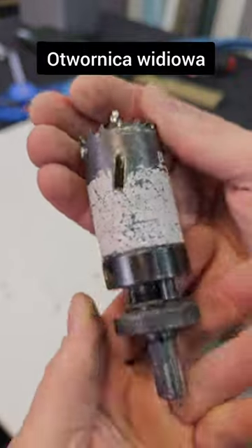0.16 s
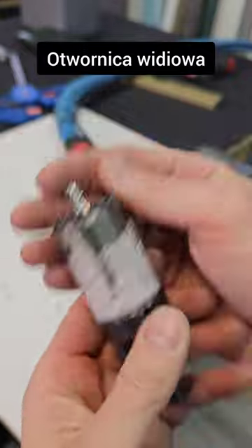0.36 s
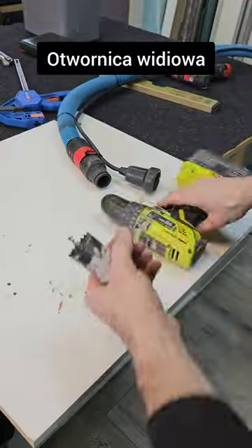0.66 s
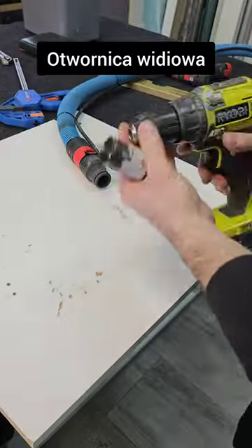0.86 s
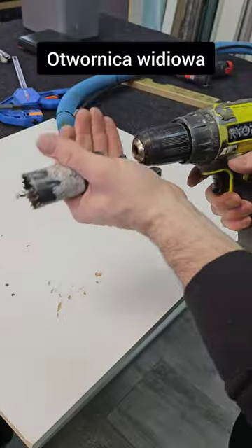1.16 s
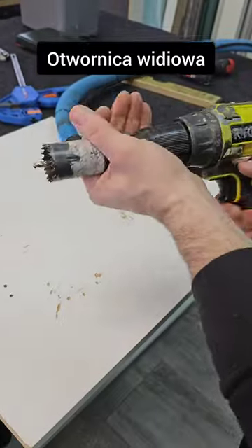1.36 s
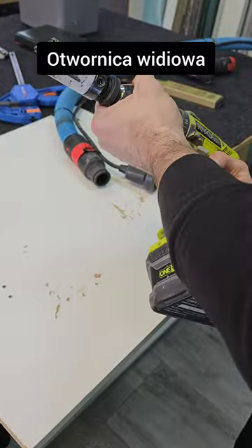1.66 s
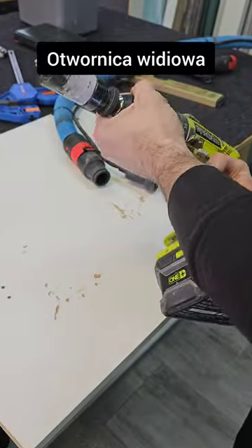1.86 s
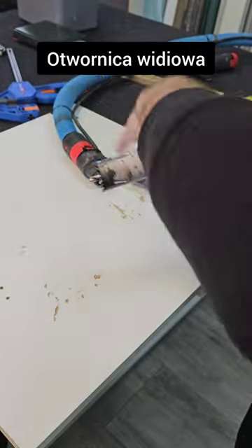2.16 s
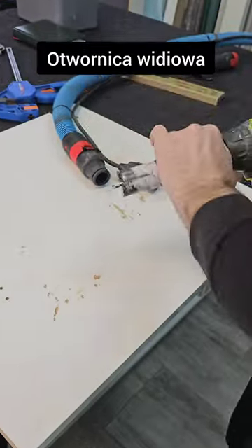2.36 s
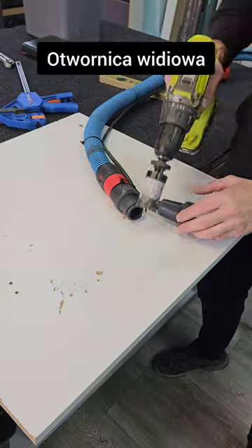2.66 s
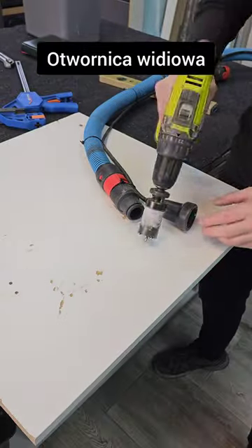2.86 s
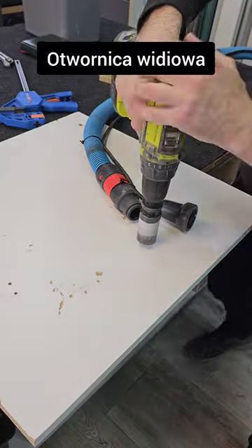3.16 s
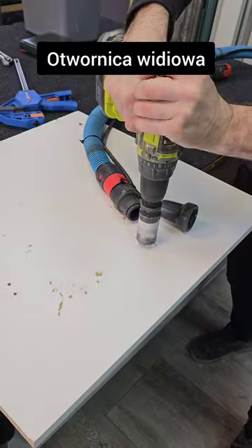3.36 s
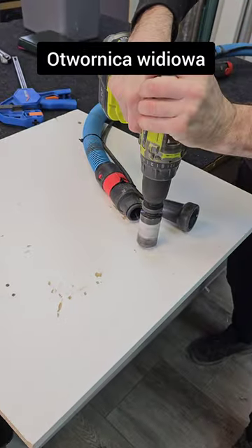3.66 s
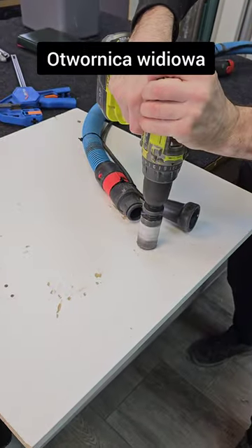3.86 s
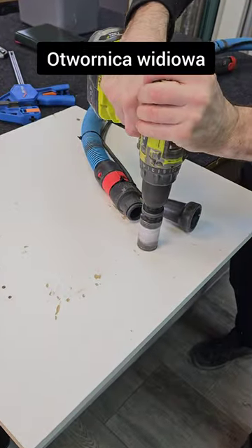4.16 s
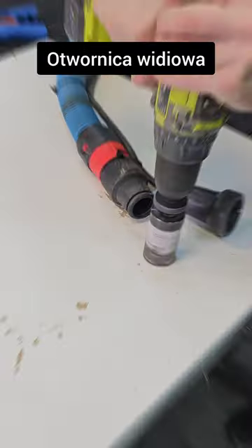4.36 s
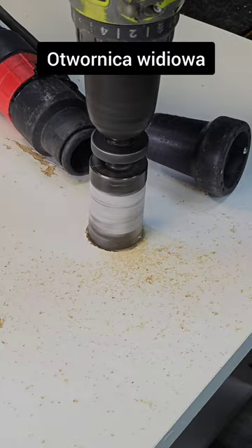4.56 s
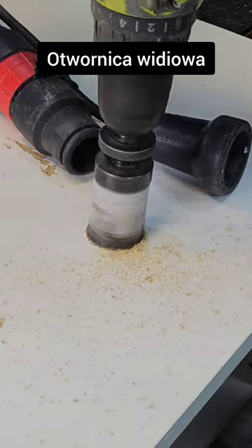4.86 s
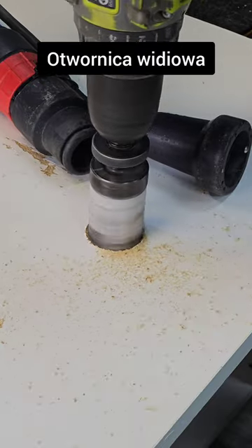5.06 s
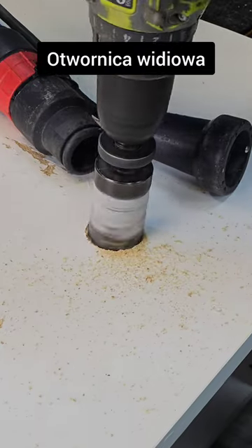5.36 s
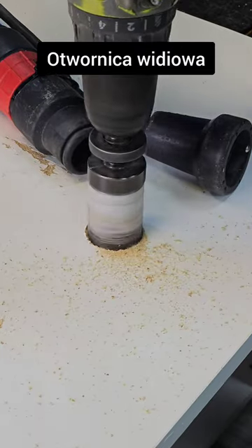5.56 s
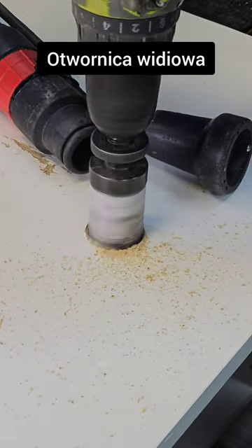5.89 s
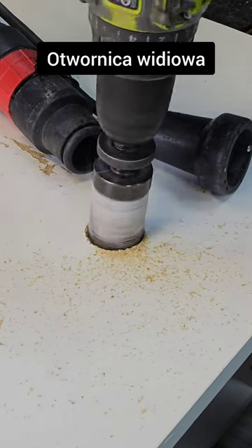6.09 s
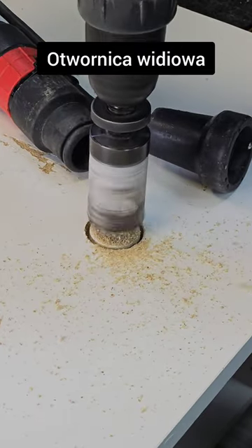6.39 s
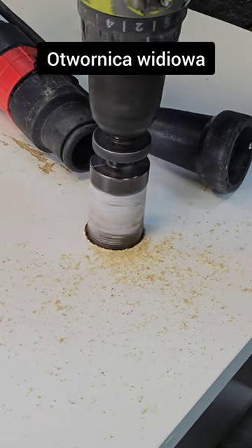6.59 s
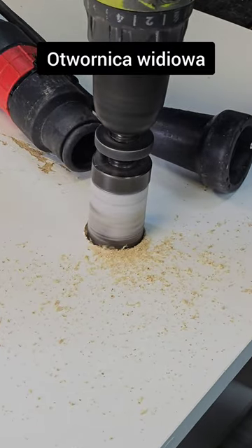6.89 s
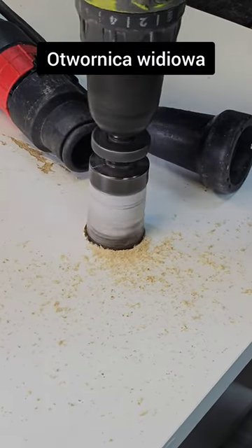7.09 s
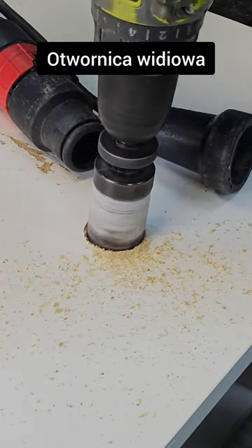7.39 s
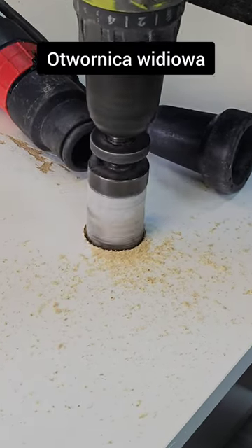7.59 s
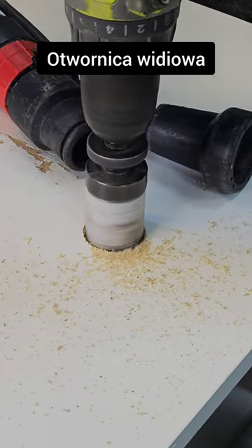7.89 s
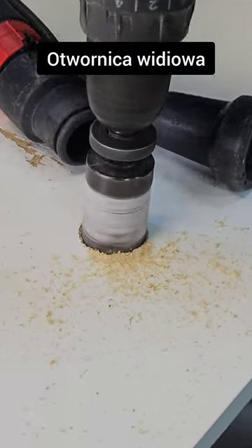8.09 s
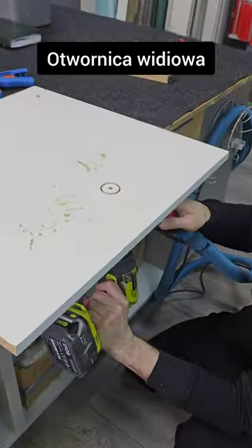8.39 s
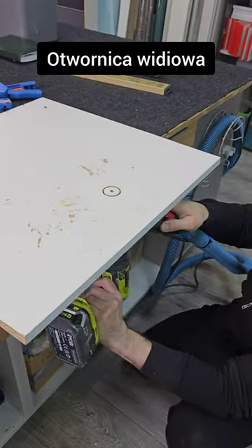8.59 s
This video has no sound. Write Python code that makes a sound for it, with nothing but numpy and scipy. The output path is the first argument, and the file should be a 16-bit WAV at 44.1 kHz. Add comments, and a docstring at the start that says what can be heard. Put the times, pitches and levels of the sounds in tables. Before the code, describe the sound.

Metallic clicks and handling scrapes, then a steady drill motor hum with thin whine, harsh grinding and wavering squeals as a hole saw cuts wood.

```python
"""In a workshop with a low hum a cordless drill bumps a board, and a hole saw clinks and rasps into its chuck.
Clinks, knocks and rings are struck modes and bursts of noise; sliding hands and sleeve are coloured grains.
The drill then runs at a governed speed: a sine hum, rattling grains and a thin narrow-band whine.
The saw grinds into the board with squeals (grains and gliding resonances), eases off once, bites again and
at last cuts from underneath. Twice the sound of drill and saw fades to near silence and back."""
import sys
import numpy as np
from scipy import signal
from scipy.fft import rfft, irfft, next_fast_len
from scipy.io import wavfile
from scipy.ndimage import map_coordinates

SR = 44100
rng = np.random.default_rng(int(sys.argv[2]) if len(sys.argv) > 2 else 0)


def materialize(psi):
    """Save the field psi as 16-bit PCM at rate SR to the path in sys.argv[1].

    A 1-D psi becomes a single channel; in a 2-D psi each row is a channel.
    """
    bounded = np.clip(np.atleast_2d(psi).T, -1, 1)
    quanta = np.round(bounded * 32767).astype(np.int16)
    wavfile.write(sys.argv[1], SR, quanta)


N = 385434
T = np.arange(N) / SR

# trigger pulled; saw sunk in its groove; cut goes on from underneath
TRIGGER_S, GROOVE_S, UNDERNEATH_S = 2.6, 4.42, 8.28
# Short jabs on the trigger spin the sleeve through the hand. Each row: start in seconds, length in seconds,
# first pitch in Hz, top pitch in Hz, relative whirr level in dB, relative rasp level in dB.
JABS = [(2.343, 0.065, 450, 1100, -38, -28), (2.457, 0.055, 492, 767, -28, -27.5)]


def from_db(db):
    """Decibels to amplitude factor."""
    return 10 ** (np.asarray(db) / 20)


def rms_one(x):
    """Scale to rms 1 over all channels."""
    return x / np.sqrt(np.mean(x ** 2) + 1e-20)


def in_time(rows):
    """Interpolate each column of a (seconds, values..) curve at every sample."""
    seconds, *columns = np.transpose(rows)
    return [np.interp(T, seconds, column) for column in columns]


def gain_at(points, hz):
    """Read a (Hz, dB) spectrum on a log-frequency axis as amplitude."""
    point_hz, db = np.transpose(points)
    return from_db(np.interp(np.log(hz + 1), np.log(point_hz), db))


def white_pair():
    """Two unrelated white noises."""
    return rng.standard_normal((2, N))


def drift(rate):
    """Slow random curve of rms 1, with 2 * rate knots per second."""
    knots = rng.standard_normal(int(N / SR * rate * 2) + 2)
    return rms_one(np.interp(T * rate * 2, np.arange(len(knots)), knots))


def grains(per_s, spread_db):
    """Two trains of random clicks of uneven size; rms 1."""
    sizes = from_db(spread_db * np.minimum(rng.exponential(1, (2, N)), 4))
    present = rng.random((2, N)) < per_s / SR
    return rms_one(rng.standard_normal((2, N)) * sizes * present)


def colour(pair, tone, peaks=()):
    """Filter two unrelated signals by a broad tone and resonances, then matrix to stereo; mid rms 1."""
    # Stereo width. Each row: frequency in Hz, side minus mid in dB.
    width = [(60, -20), (250, -14), (500, -11), (1000, -4), (2000, -3.5), (8000, 1), (13000, 2)]
    size = next_fast_len(N)
    hz = np.arange(size // 2 + 1) * SR / size
    power_lift = 1
    for peak_hz, width_hz, db in peaks:
        power_lift = power_lift + (from_db(db) ** 2 - 1) / (1 + (2 * (hz - peak_hz) / width_hz) ** 2) ** 2
    gain = gain_at(tone, hz) * np.sqrt(np.abs(power_lift))
    spectra = rfft(pair, size) * gain * [np.ones_like(hz), gain_at(width, hz)]
    mid, side = irfft(spectra, size)[:, :N]
    return np.array([mid + side, mid - side]) / np.sqrt(np.mean(mid ** 2))


def narrow(hz, width_hz):
    """Friction-driven resonance: low-passed complex noise shifted to a centre that may move; stereo, rms 1."""
    white = rng.standard_normal((2, N)) + 1j * rng.standard_normal((2, N))
    a, b = signal.sosfilt(signal.butter(2, width_hz / 2, fs=SR, output="sos"), white)
    carrier = np.exp(2j * np.pi * np.cumsum(hz + 0 * T) / SR)
    return rms_one(np.real(np.array([a + 0.48 * b, a - 0.21 * b]) * carrier))


def strike(times_s, levels_db, modes):
    """Each blow rings every decaying mode, with a random strength per mode."""
    out = np.zeros(N)
    for hz, db, t60_s in modes:
        clicks = np.zeros(N)
        blow_db = np.array(levels_db) + db + rng.normal(0, 1, len(times_s))
        clicks[(np.array(times_s) * SR).astype(int)] = from_db(blow_db)
        radius = from_db(-60 / (t60_s * SR))
        angle = 2 * np.pi * hz / SR
        poles = [1, -2 * radius * np.cos(angle), radius * radius]
        out += rng.choice([-1, 1]) * signal.lfilter([0, np.sin(angle)], poles, clicks + 1e-18)
    return out


def bursts(times_s, levels_db, decay_s):
    """Envelope that jumps at each contact and dies away exponentially."""
    jumps = np.zeros(N)
    jumps[(np.array(times_s) * SR).astype(int)] = from_db(levels_db)
    return signal.lfilter([1], [1, -np.exp(-1 / (decay_s * SR))], jumps + 1e-18)


def strokes(rows, attack_s, release_s):
    """Envelope of (start s, length s, dB) movements: linear rise, hold, exponential fall; loudest wins."""
    out = np.zeros(N)
    for start_s, length_s, db in rows:
        rise = np.clip((T - start_s) / attack_s, 0, 1)
        fall = np.exp(-np.clip((T - start_s - length_s) / release_s, 0, 20))
        out = np.maximum(out, from_db(db) * rise * fall)
    return out


def by_stage(free, groove, below):
    """Select by stage: drill in the open, saw in its groove, cut from underneath."""
    return np.where(T < GROOVE_S, free, np.where(T < UNDERNEATH_S, groove, below))


def room_air():
    """Faint broadband room noise, weighted to the bass."""
    # Each row: frequency in Hz, relative level in dB.
    room_tone = [(15, -34), (25, -1), (75, 1), (167, -20), (3830, -38), (10000, -42), (15000, -45)]
    return from_db(-65.0) * colour(white_pair(), room_tone)


def room_hum():
    """A low sine with wandering phase and level, louder in swells."""
    # Each row: start in seconds, length in seconds, relative level in dB added to the steady hum.
    hum_swells = [(-.1, .11, -54), (.7, .82, -56)]
    gain = from_db(-70) + strokes(hum_swells, attack_s=.08, release_s=.05)
    tone = np.sin(2 * np.pi * 68 * T + .5 * drift(4.6))
    return gain * tone * from_db(2 * drift(2.8))


def workshop(x, wet_db, t60_s):
    """Add a short diffuse tail of decaying noise, different at each ear."""
    t = T[:SR // 2]
    tail = rng.standard_normal((2, len(t))) * np.exp(-np.log(1000) * t / t60_s) * (t > .004)
    tail = signal.lfilter([1], [1, -.4], tail)
    tail = tail / np.sqrt(np.sum(tail[0] ** 2))
    return x + from_db(wet_db) * signal.fftconvolve(x, tail, axes=1)[:, :N]


def fumbling():
    """The drill shifts in the hand: a soft swell of low noise."""
    # Each row: start in seconds, length in seconds, level in dB.
    shifts = [(.57, 0.32, -54)]
    tone = [(60, -1), (250, 1), (550, -6), (1200, -34), (8000, -60)]
    return strokes(shifts, attack_s=0.04, release_s=0.11) * colour(white_pair(), tone)


def board_knocks():
    """The drill knocks on the board: returns the ringing modes and the crack of contact noise."""
    # Each row: time in seconds, relative level in dB.
    blows = [(.706, -16), (.712, -25), (0.733, -28)]
    # Board modes. Each row: frequency in Hz, relative level in dB, t60 in seconds.
    board_modes = [(159.4, -3, 0.14), (269, -6, 0.1), (400, 2.5, 0.05), (511, -7, 0.17), (684, -9, 0.043),
                   (940, -25, .05)]
    times_s, knock_db = np.transpose(blows)
    crack_tone = [(60, 9.5), (700, -5), (2000, -13.5), (12000, -37)]
    crack = bursts(times_s, knock_db - 5.5, decay_s=0.0085) * colour(white_pair(), crack_tone)
    return strike(times_s, knock_db, board_modes), crack


def clinks():
    """Steel touches the chuck: noise ticks and the ringing modes of the saw cup."""
    # Each row: time in seconds, relative tick level in dB, relative ring level in dB.
    touches = [(0.837, -36, -70), (0.863, -28, -70), (1.231, -21.5, -60), (1.244, -20, -39),
               (1.294, -22, -43), (1.314, -10, -25), (1.37, -23, -35), (1.459, -33, -43), (1.545, -35, -54),
               (1.588, -19, -47), (1.611, -25, -25), (1.649, -21, -25.5), (1.669, -22, -31),
               (1.685, -18.5, -26), (1.712, -31, -30), (2.13, -33, -57)]
    # Saw cup modes. Each row: frequency in Hz, relative level in dB, t60 in seconds.
    cup_modes = [(1830, -14, .1), (3000, -17, 0.23), (4420, 0, 0.15), (4500, -3.5, 0.1), (6770, 1, 0.017),
                 (8720, -12, 0.075), (15550, -16, .1)]
    # Each row: frequency in Hz, relative level in dB.
    tick_tone = [(100, -34), (500, 12), (1800, 7.5), (3000, 3), (7000, -4), (10000, -13), (16000, -4)]
    times_s, tick_db, ring_db = np.transpose(touches)
    ticks = bursts(times_s, tick_db - 8.5, decay_s=0.0036) * colour(white_pair(), tick_tone)
    return ticks + strike(times_s, ring_db, cup_modes)


def brushed_cup():
    """Fingers brush the teeth and the cup sings faintly on two friction-driven modes."""
    # Each row: start in seconds, length in seconds, relative level in dB.
    touches = [(.23, 0.064, -64), (.35, 0.058, -66)]
    modes = narrow(4450, width_hz=100) + from_db(-1) * narrow(8740, width_hz=150)
    return strokes(touches, attack_s=0.037, release_s=.012) * modes


def sliding():
    """Hands and chuck sleeve slide, in rubs and at each jab: coloured grains under a pressure envelope."""
    # Each row: start in seconds, rise in seconds, length in seconds, relative level in dB.
    hand_rubs = [(.33, 0.028, .05, -63), (.6, 0.072, 0.14, -52.5), (.8, .07, 0.16, -53.5),
                 (.972, .018, 0.11, -28), (1.222, .015, .028, -40), (1.25, .06, 0.15, -45),
                 (1.42, .04, 0.2, -53.5), (1.575, .025, 0.38, -34.5), (1.81, 0.037, 0.051, -27),
                 (2.12, .01, 0.018, -51), (2.16, 0.072, 0.13, -48.5)]
    # Each row: frequency in Hz, relative level in dB.
    slide_tone = [(80, -22), (170, -16), (280, -0.5), (800, 3.5), (1500, 0.5), (4500, 1), (6300, -6.5),
                  (7400, -1.5), (10000, -10.5), (12000, -6), (16000, -18.5)]
    jab_rise_s, release_s = 0.027, 0.015
    slides = list(hand_rubs)
    slides += [(start_s, jab_rise_s, length_s, rasp_db) for start_s, length_s, *_, rasp_db in JABS]
    envelopes = [strokes([(start_s, length_s, db)], rise_s, release_s)
                 for start_s, rise_s, length_s, db in slides]
    pressure = np.max(envelopes, axis=0)
    return from_db(-3.0) * pressure * colour(grains(per_s=10000, spread_db=2.0), slide_tone)


def jabs():
    """At each jab the motor whirrs up exponentially towards its top pitch and fades as it coasts out."""
    spin_up_s, coast_s = 0.022, 0.025
    out = np.zeros(N)
    for start_s, length_s, first_hz, top_hz, db, _ in JABS:
        lag = np.exp(-np.clip((T - start_s) / spin_up_s, 0, 20))
        hz = top_hz + (first_hz - top_hz) * lag
        level = strokes([(start_s, length_s / 2, db)], attack_s=.01, release_s=coast_s)
        out += level * np.sin(2 * np.pi * np.cumsum(hz) / SR)
    return out * from_db(2.9 * drift(150))


def fitting():
    """Handling, knocks, clinks, sliding and jabs; all but the knock modes and fumbling get the room tail."""
    knock, crack = board_knocks()
    reverberant = clinks() + brushed_cup() + crack + sliding() + jabs()
    return knock + fumbling() + workshop(reverberant, wet_db=-10, t60_s=0.26)


def rotor_turns():
    """Accumulated rotor turns: governed speed, dragged down a little in the groove, with a random wobble."""
    free_hz, drag_hz, wobble_hz = 454, 4, 1.8
    speed_hz = free_hz - drag_hz * (T >= GROOVE_S) + wobble_hz * drift(5)
    return np.cumsum(speed_hz) / SR


def throb(turns):
    """Geared down 21 to 1, the slightly oval saw loads the tool twice in each of its turns."""
    return rms_one(from_db(1.4 * np.cos(2 * np.pi * 2 * turns / 21)))


def rotor_hum(turns):
    """A sine at the rotor rate, offset in phase between the ears; the sunken saw couples it into the board."""
    # Hum in the groove. Each row: time in seconds, mean level in dB.
    groove_hum = [(4.6, -20.5), (5.2, -17.3), (6.17, -17), (6.33, -14.5), (8.0, -18.3)]
    hum_db = by_stage(-28.5, in_time(groove_hum)[0], -23.5)
    phase_rad = 2 * np.pi * turns + np.array([[.25], [-.25]])
    return np.sqrt(2) * from_db(hum_db + .5 * drift(16)) * np.sin(phase_rad)


def gear_rattle(turns):
    """Gear teeth rattle: throbbing grains through the gearbox resonances."""
    # One level in dB each: in the open, sunk in the groove, under the board.
    gears_db = (-24, -21, -25.5)
    # Each row: frequency in Hz, relative level in dB.
    gear_tone = [(25, -17), (60, -4), (110, 3), (200, -0.5), (380, -4), (560, -1), (900, -8.5),
                 (1900, -5.5), (2700, -11.5), (6500, -17.5), (10000, -19), (16000, -25.5)]
    # Each row: frequency in Hz, width in Hz, lift in dB.
    gear_peaks = [(238, 69, 9.5), (1230, 900, 5.5), (4320, 1200, 5.5), (7540, 540, 11.5), (8100, 590, 13.5),
                  (8720, 470, 11.5), (11500, 700, 7)]
    teeth = grains(per_s=8000, spread_db=1.5) * throb(turns)
    return from_db(by_stage(*gears_db)) * colour(teeth, gear_tone, gear_peaks)


def whine():
    """A thin wavering narrow band: dies down after the start, swells in the groove, absent underneath."""
    start_db, groove_db, swell_db = -26, -26.5, 2.5
    starting = strokes([(TRIGGER_S, .4, start_db)], attack_s=.15, release_s=.5)
    swelling = from_db(groove_db + swell_db * drift(4))
    return by_stage(starting, swelling, 0) * narrow(8210 + 12 * drift(3.9), width_hz=30)


def drill(turns):
    """Rotor hum, gear rattle and whine, from the moment the trigger is pulled."""
    return (rotor_hum(turns) + whine() + gear_rattle(turns)) * (T >= TRIGGER_S)


def chirps(rows):
    """Short tones that glide, swell and die, roughened by fast level drift."""
    out = np.zeros(N)
    for start_s, length_s, first_hz, last_hz, db in rows:
        part = np.clip((T - start_s) / length_s, 0, 1)
        phase_rad = 2 * np.pi * np.cumsum(first_hz + (last_hz - first_hz) * part) / SR
        out += from_db(db) * np.sqrt(8 * part * (1 - part)) * np.sin(phase_rad)
    return out * from_db(4.6 * drift(150))


def surging(x, depth_db, rate):
    """Bands up to 4.8 kHz swell and sink independently as the teeth meet coarser or finer wood."""
    out = 0
    for hz in 300 * 2. ** np.arange(5):
        low = signal.sosfiltfilt(signal.butter(2, hz, fs=SR, output="sos"), x)
        out = out + low * from_db(depth_db * drift(rate))
        x = x - low
    return out + x


def grinding(chips, bite):
    """Torn chips shake the board through its resonances; a light touch scrapes duller."""
    # Each row: frequency in Hz, relative level in dB.
    cut_tone = [(25, -26), (70, 0.5), (150, 2), (400, 1.5), (620, 0.5), (1000, -4.5), (1700, -1),
                (2500, -5.5), (4600, -5), (5900, -9.5), (6900, -17), (8400, -10.5), (10000, -17.5),
                (16000, -23.5)]
    # Each row: frequency in Hz, width in Hz, lift in dB.
    cut_peaks = [(252.5, 80, 8.9), (338, 39, 7.5), (522, 70, 12), (715, 46, 10.5), (828, 103, 8.4),
                 (1260, 295, 7.9), (2150, 350, 4.9), (2916, 130, 7.4), (3560, 73, 4.6)]
    grind = surging(colour(chips, cut_tone, cut_peaks), depth_db=1.5, rate=12)
    dull = signal.sosfiltfilt(signal.butter(2, 2300, fs=SR, output="sos"), grind)
    return dull + (grind - dull) * bite ** 0.2


def squealing():
    """The cup rubs in its groove: gliding friction modes, and its wall growls in swells."""
    # One curve for each deep cut. Each row: time in seconds, mean squeal frequency in Hz.
    squeal_curves = [
        [(4.55, 4700), (4.72, 4100), (4.85, 4340), (5.03, 4050), (5.28, 4470), (5.42, 4150), (5.92, 4390),
         (6.05, 3700), (6.17, 4350)],
        [(6.63, 4750), (6.92, 4800), (7.0, 4400), (7.3, 4780), (7.42, 4100), (7.65, 4200), (7.8, 3900),
         (8.08, 4330), (8.25, 3850)],
    ]
    squeal_hz = in_time(np.vstack(squeal_curves))[0] + 25 * drift(30)
    twin_mode = from_db(-21.5 + 2.5 * drift(6)) * narrow(squeal_hz + 170 * drift(6), width_hz=110)
    low_mode = from_db(-13.5 + 1.2 * drift(12)) * narrow(squeal_hz, width_hz=150)
    high_mode = from_db(-23.5 + 2.5 * drift(5)) * narrow(1.48 * squeal_hz, width_hz=170)
    high_mode = high_mode * (squeal_hz < 4450)
    growl = from_db(-16 + 3.5 * drift(5)) * narrow(1230 + 50 * drift(4), width_hz=110)
    return low_mode + twin_mode + high_mode + growl


def cut_above(chips, turns):
    """The saw is leaned into the board: grinding, squeals, a board drone and skidding teeth."""
    # Each row: start in seconds, length in seconds, grinding level in dB.
    presses = [(3.36, 5.4, -27), (4.02, 0.45, -22), (4.33, 1.845, -13.5), (6.53, 1.8, -13.5)]
    # A tooth skids. Each row: start in seconds, length in seconds, first Hz, last Hz, mean level in dB.
    skids = [(7.405, .04, 2930, 2850, -20), (7.735, .03, 2650, 2580, -23)]
    feed = strokes(presses, attack_s=0.14, release_s=0.012) * (T < UNDERNEATH_S)
    bite = np.minimum(feed / from_db(-16.5), 1)   # 1 = teeth pressed fully into the wood
    # the board's lowest mode answers even a light touch
    drone = from_db(-24.5) * feed ** 0.43 * narrow(110, width_hz=25.5).mean(axis=0)
    cutting = feed * (grinding(chips, bite) + bite * squealing() * throb(turns))
    return cutting + drone + chirps(skids)


def cut_below(chips):
    """The cut from underneath: chips through other board resonances, plus a narrow ring of the cup."""
    # Each row: frequency in Hz, relative level in dB.
    below_tone = [(25, -12), (80, -5), (140, 3.5), (600, -2.5), (1000, -4.5), (2600, -4.5), (3500, -9.5),
                  (6500, -17), (16000, -26)]
    # Each row: frequency in Hz, width in Hz, lift in dB.
    below_peaks = [(159, 19, 12.7), (268, 44, 7.9), (510, 65, 9.2), (684, 38, 9.1), (819, 20, 10.5),
                   (1150, 45, 6.4), (1440, 50, 10), (1875, 85, 11.5), (2200, 90, 11.5), (2520, 89, 5.5),
                   (2770, 78, 7)]
    cup_ring = from_db(-18.0) * narrow(8780, width_hz=24)   # relative to the grinding
    return from_db(-17.5) * (T >= UNDERNEATH_S) * (colour(chips, below_tone, below_peaks) + cup_ring)


def sawing(turns):
    """Teeth tear chips, grains throbbing with the saw's turning, that drive both cuts."""
    chips = grains(per_s=9000, spread_db=0.7) * throb(turns) * from_db(0.57 * drift(25))
    return cut_above(chips, turns) + cut_below(chips)


def fades():
    """Straight gain ramps down to near silence and up again."""
    # Each row: time of the minimum in seconds, fade out in seconds, fade in in seconds.
    dips = [(GROOVE_S, 0.18, .2), (UNDERNEATH_S, .38, .35)]
    ramps = [np.maximum((low_s - T) / out_s, (T - low_s) / in_s) for low_s, out_s, in_s in dips]
    return np.clip(np.min(ramps, axis=0), .006, 1)


def scene():
    """Fitting, running and cutting, placed by level and delay between the ears, over a quiet humming room."""
    # Drill position. Each row: time in seconds, left minus right in dB, left lead in ms.
    position = [(0, 1, .16), (1.2, 1.5, .17), (1.7, 3.3, .18), (2.6, 1.4, .05), (3.7, .9, .01), (4.2, 0, 0)]
    turns = rotor_turns()
    left, right = fitting() + (drill(turns) + sawing(turns)) * fades()
    pan_db, lead_ms = in_time(position)
    late_right = map_coordinates(right, [(T - lead_ms / 1000) * SR], order=3)
    tools = np.array([left, late_right]) * from_db(pan_db * np.array([[.5], [-.5]]))
    return tools + room_air() + room_hum()


def record(dry):
    """Round off the highest peaks and cut the top steeply."""
    cutoff_hz = 15900
    rounded = dry / (1 + dry ** 6) ** (1 / 6)
    return signal.sosfilt(signal.ellip(12, .1, 80, cutoff_hz, fs=SR, output="sos"), rounded)


dry = scene()
out = record(dry)
materialize(out)
```